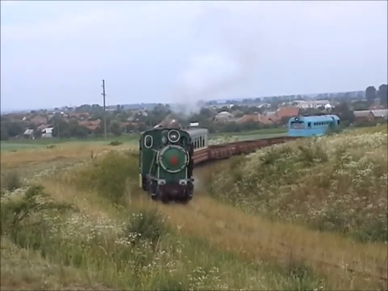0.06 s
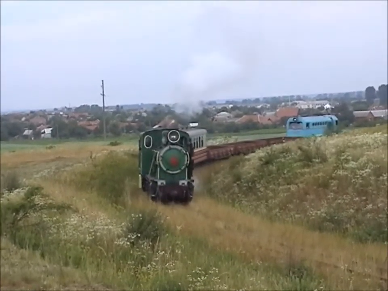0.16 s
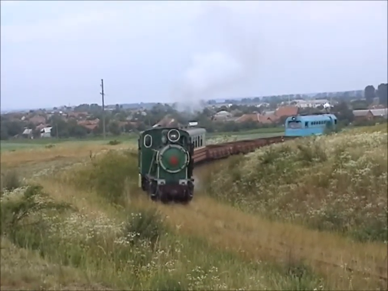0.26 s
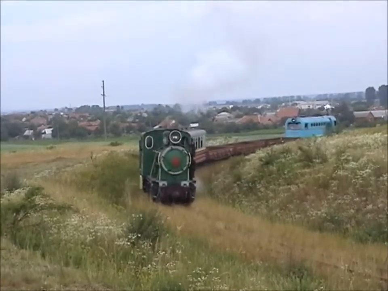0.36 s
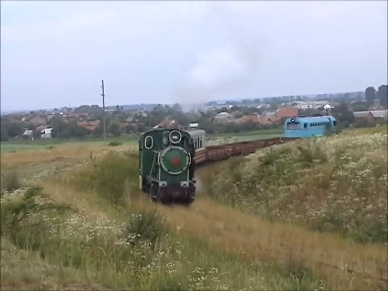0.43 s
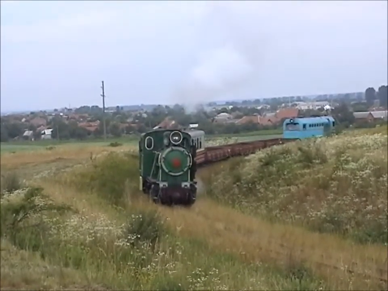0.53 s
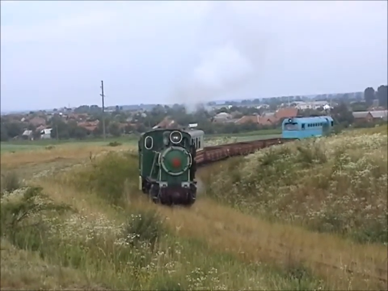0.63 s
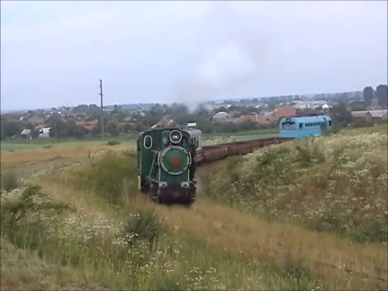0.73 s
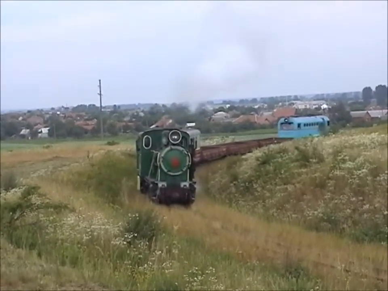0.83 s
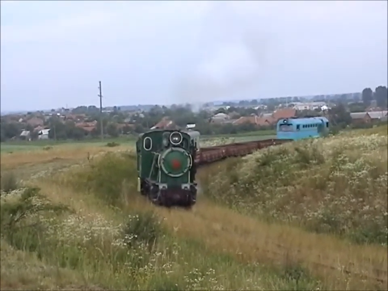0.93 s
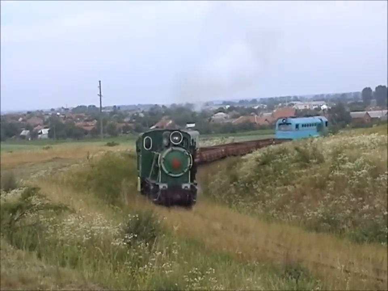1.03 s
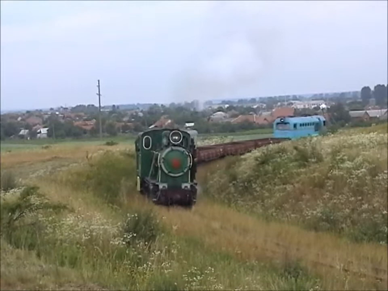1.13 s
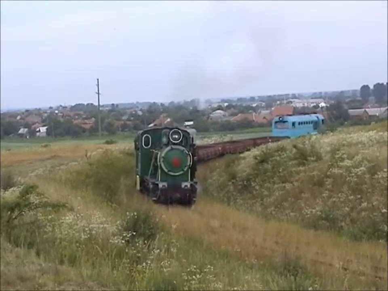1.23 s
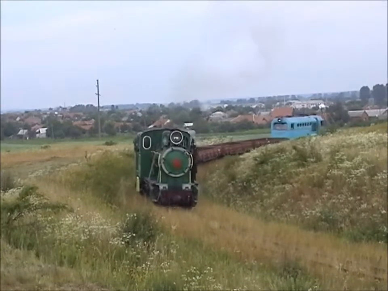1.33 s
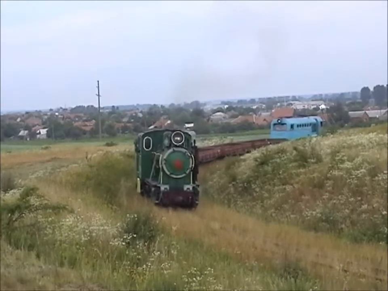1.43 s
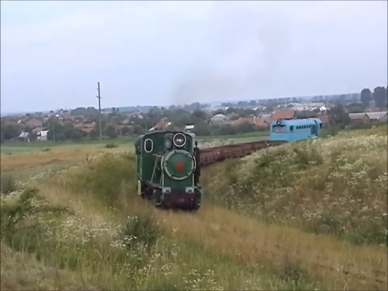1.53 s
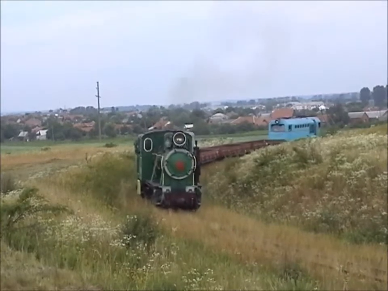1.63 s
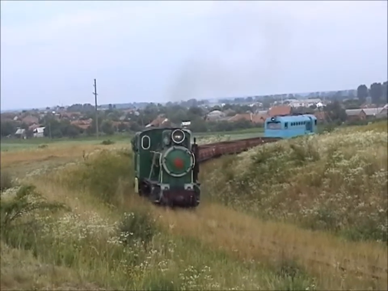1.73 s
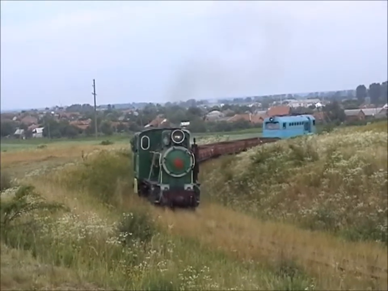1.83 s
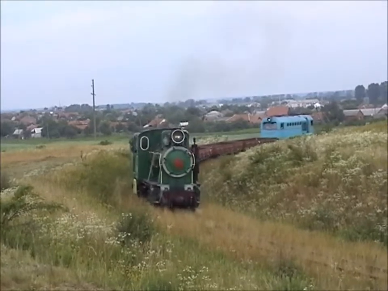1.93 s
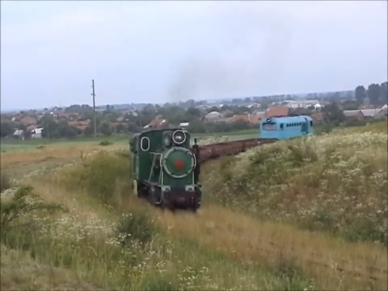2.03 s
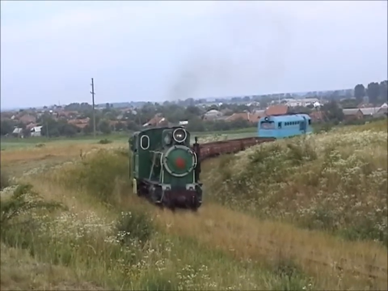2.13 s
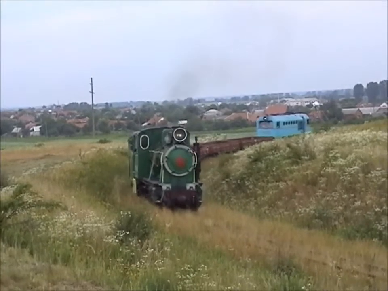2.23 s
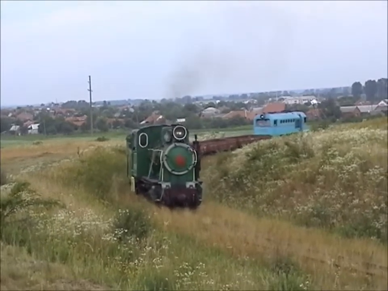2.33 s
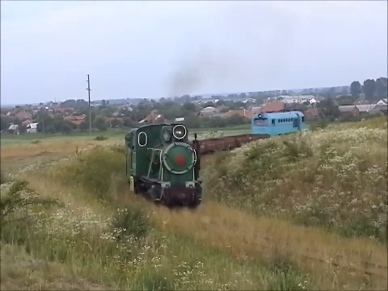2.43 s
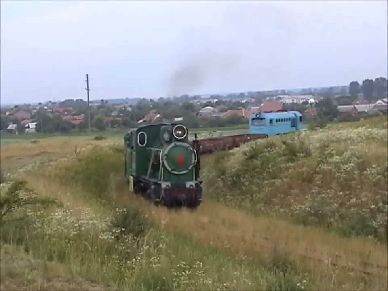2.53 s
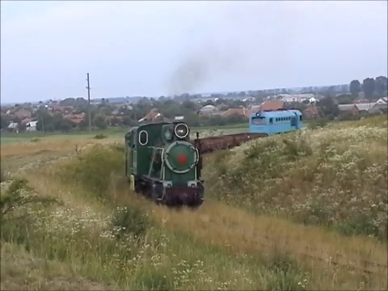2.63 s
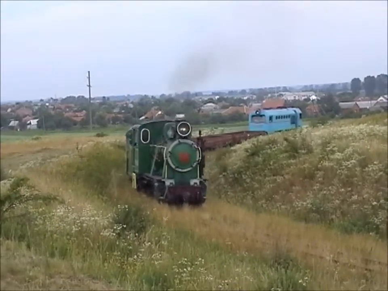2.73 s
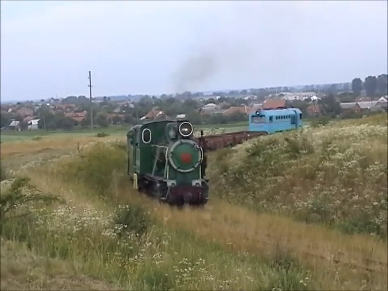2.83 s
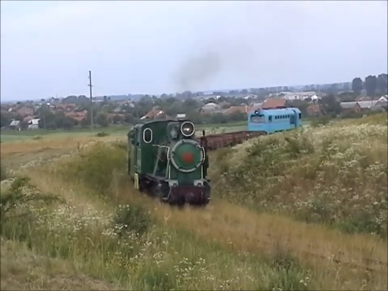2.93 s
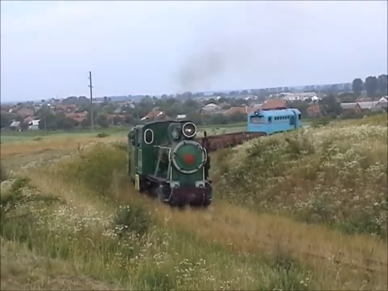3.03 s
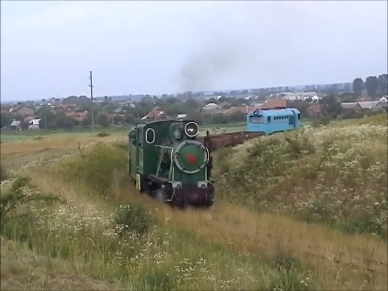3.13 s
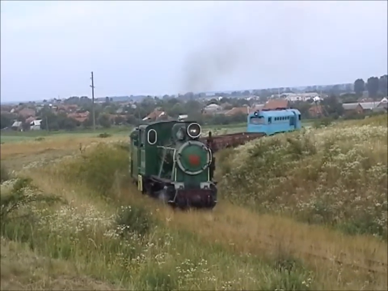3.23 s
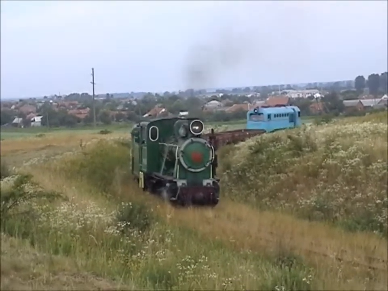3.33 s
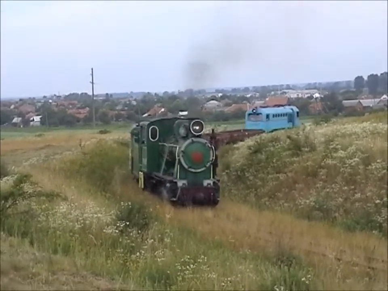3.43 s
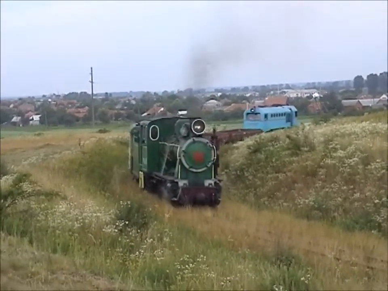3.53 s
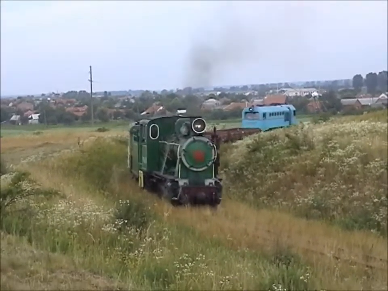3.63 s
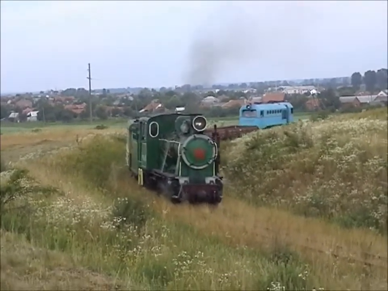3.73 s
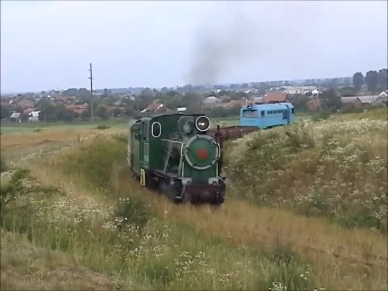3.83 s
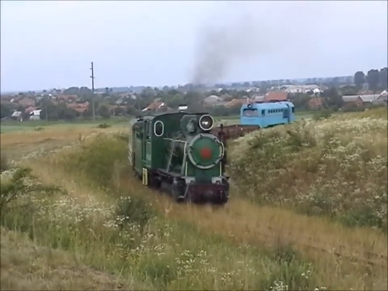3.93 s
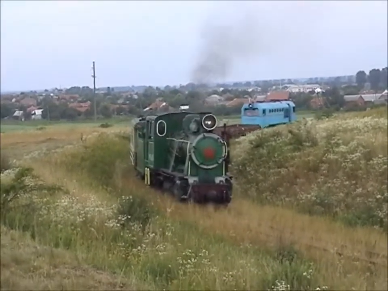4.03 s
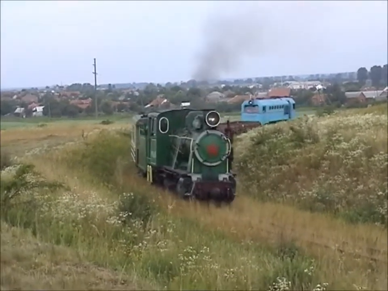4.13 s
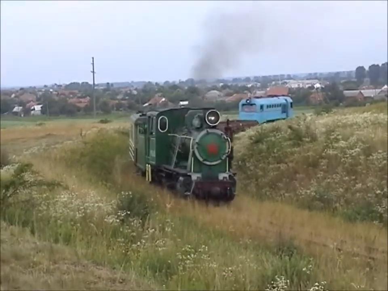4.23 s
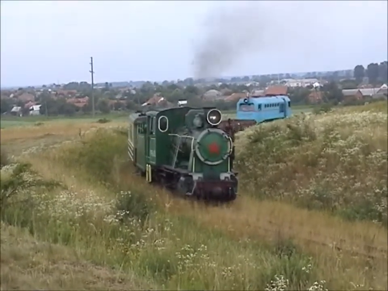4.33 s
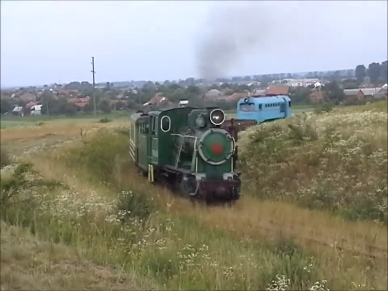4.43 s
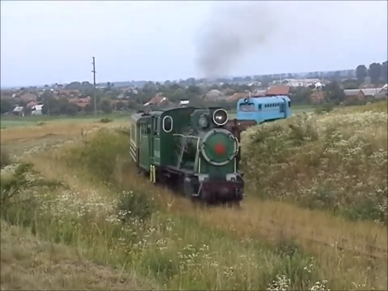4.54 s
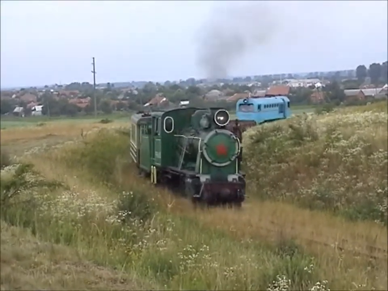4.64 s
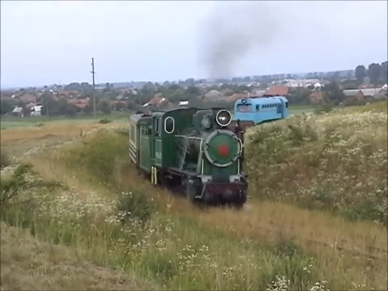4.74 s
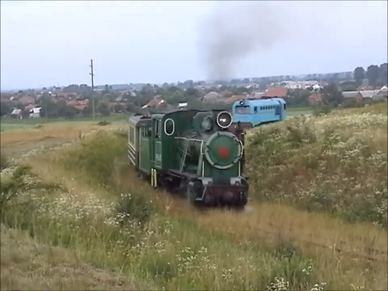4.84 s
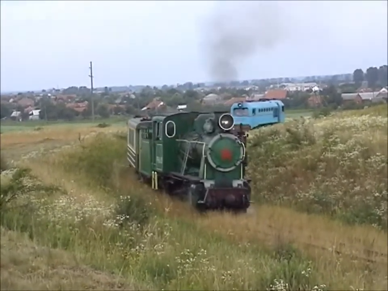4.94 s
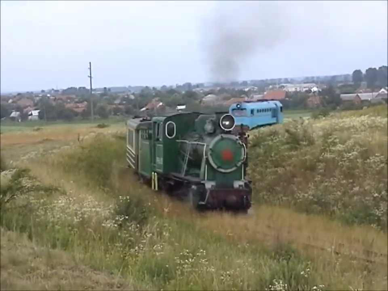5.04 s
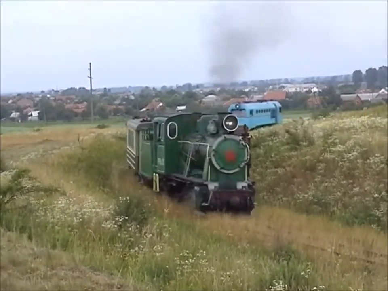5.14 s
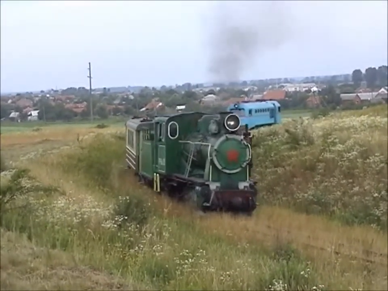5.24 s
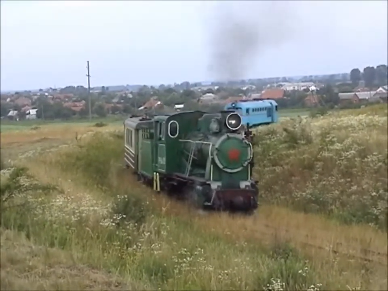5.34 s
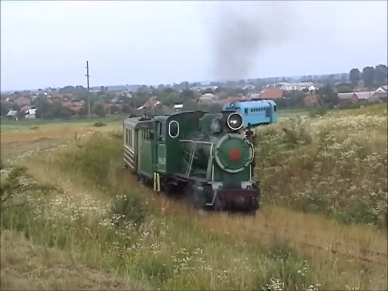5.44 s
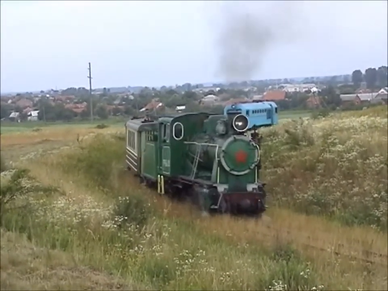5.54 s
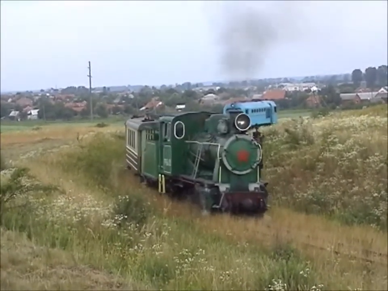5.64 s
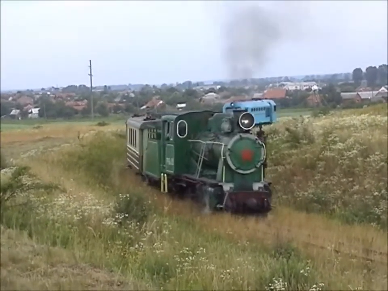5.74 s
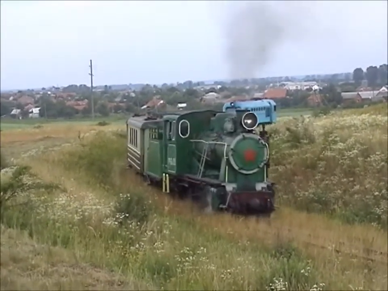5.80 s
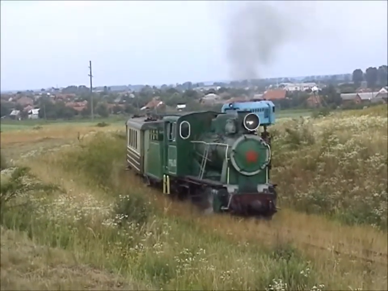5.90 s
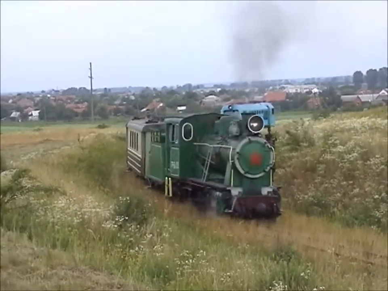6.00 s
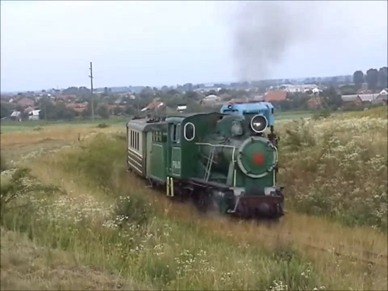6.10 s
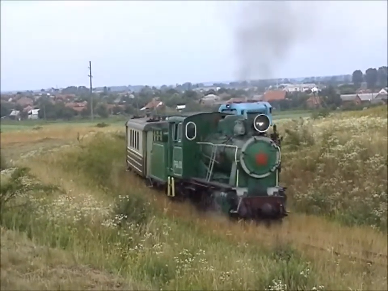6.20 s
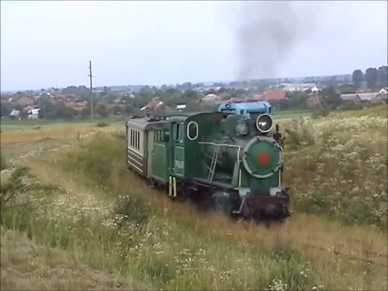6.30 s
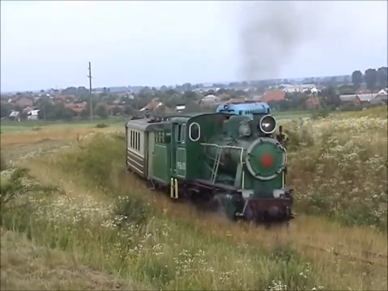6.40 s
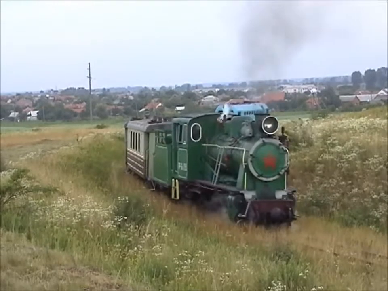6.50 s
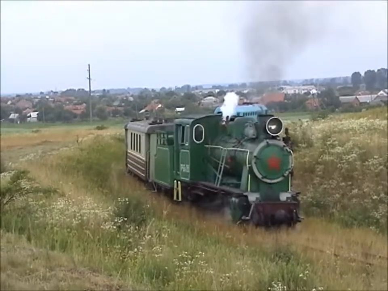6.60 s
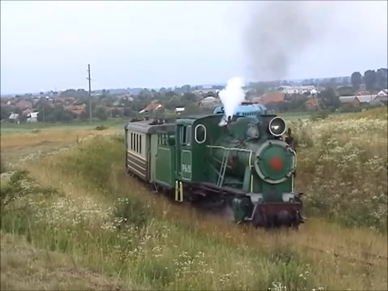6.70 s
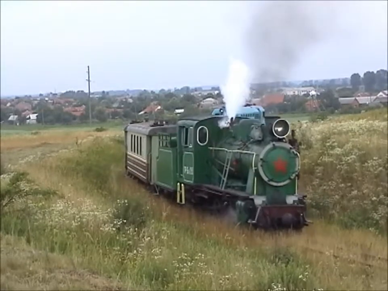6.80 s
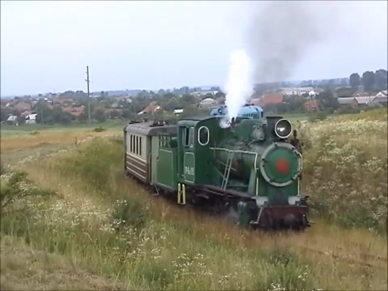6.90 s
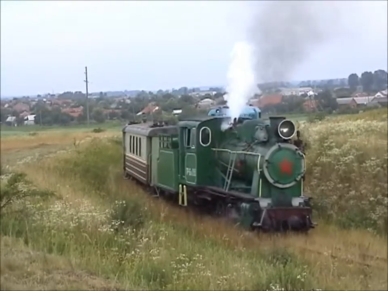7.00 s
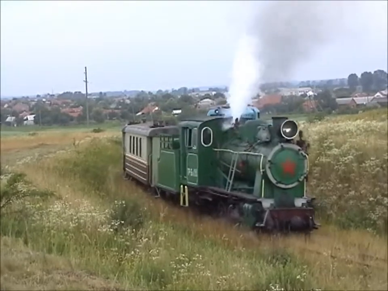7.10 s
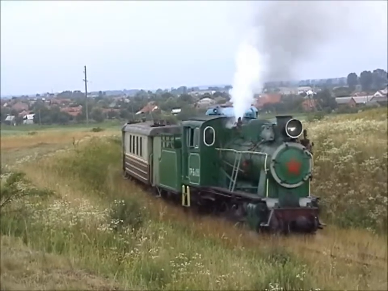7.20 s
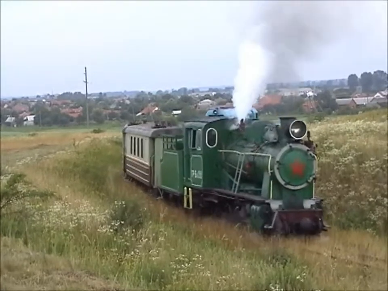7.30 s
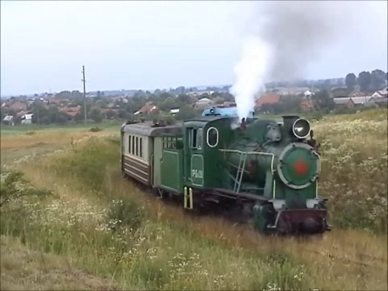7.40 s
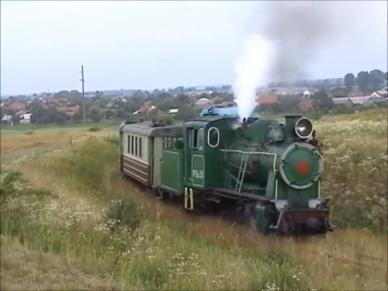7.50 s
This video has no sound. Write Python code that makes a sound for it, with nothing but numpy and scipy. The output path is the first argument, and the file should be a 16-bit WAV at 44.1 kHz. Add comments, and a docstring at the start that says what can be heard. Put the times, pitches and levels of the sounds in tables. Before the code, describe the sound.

From 0 s a slow steam locomotive is heard in the open, already mid-turn. New wheel turns begin near 0.5, 1.5, 2.4, 3.3, 4.1, 5.0 and 5.9 s. Each opens with a bright, sizzling jet of wet steam, torn by tiny crackling bursts, then overlaps into a lower, hollow rush. Four soft, wavering low chuffs per turn sit underneath, the first strongest, with a faint rumble of wheels and uneven clatter of rods and couplings. Opening gushes and chuffs grow fuller as the engine nears, strongest around 5.9 s. At about 6.5 s the whistle spits wet steam; from 6.56 s it speaks loudly, flat and rough, glides upward over a few tenths of a second and brightens. A higher chime joins around 6.7 s, with steady hiss. The train drops far beneath, a faint clank buried at 7 s, and the whistle holds to the end, about 7.5 s.

```python
"""A narrow-gauge steam locomotive rolls slowly closer across open grassland. Once a wheel turn its cylinders
blow shaped noise: a bright, sizzling jet, then a hollow rush, both torn by random bursts.
The chimney gives four soft beats a turn, wavering low sines and puffs of noise, over filtered-noise rumble and clatter.
At the end the whistle spits noise, then speaks in gliding sines with overtones, a second chime and a hiss;
the train sinks away beneath it."""
import sys
import numpy as np
from scipy import signal
from scipy.fft import rfft, irfft
from scipy.io import wavfile
from scipy.ndimage import map_coordinates

SR = 44100
rng = np.random.default_rng(int(sys.argv[2]) if len(sys.argv) > 2 else 0)


def master(y):
    """Save y as 16-bit WAV."""
    cut = np.clip(np.atleast_2d(y).T, -1, 1)
    pcm = np.round(cut * 32767)  # scale
    wavfile.write(sys.argv[1], SR, pcm.astype(np.int16))


N = 333396
T = np.arange(N) / SR
FROM_MIDDLE_S = T - T.mean()
HZ = np.maximum(np.arange(N // 2 + 1) * SR / N, 1)
SIDES = np.array([[1], [-1]])  # left, right
SPEAKS_S = 6.561  # the whistle's bell sounds
DRIES_S = 6.635  # the whistle's condensate clears


def undb(db):
    """Decibels to gain."""
    return 10 ** (np.asarray(db) / 20)


def ramp(start, length):
    """A straight rise from 0 to 1."""
    return np.clip((T - start) / length, 0, 1)


def swell(t, rise, fall):
    """A puff that builds up straight and dies away exponentially; peak 1."""
    return np.clip(t / rise, 0, 1) * np.exp(-np.maximum(t - rise, 0) / fall)


def stroke(t, rise, hold, fall, sag_db=0):
    """Flow through a valve: it opens, sags by sag_db a second for up to 1 s, and starts to close at the time hold."""
    opening = np.clip(t / rise, 0, 1)
    sag = undb(-sag_db * np.clip(t - rise, 0, 1))
    closing = np.clip(1 - (t - hold) / fall, 0, 1)
    return opening * sag * closing


def walk(rate):
    """Smooth chance with a spread near 1 that changes about rate times a second."""
    knots = rng.standard_normal(4000)
    fine = signal.resample_poly(knots, 8, 1)
    return np.interp(T * rate * 2, np.arange(len(fine)) / 8, fine)


def colour(points, peaks=()):
    """Gain at every frequency: a broad outline, straight over log frequency, with resonances on top."""
    hz, db = np.transpose(points)
    outline = np.interp(np.log(HZ), np.log(hz), db)
    resonances = sum(lift * np.exp(-2 * ((HZ - f) / width) ** 2) for f, width, lift in peaks)
    return undb(outline + resonances)


def noise(gain, band=(0, SR)):
    """Coloured stereo noise, nearly alike left and right; its mid has rms 1 inside the band (Hz)."""
    # stereo width: (frequency [Hz], side minus mid [dB])
    side_level = [(60, -19), (700, -17), (1300, -13), (2400, -19), (6000, -21.5), (9000, -8.5),
                  (12000, -35)]
    # stereo balance: (frequency [Hz], left minus right [dB])
    left_lean = [(60, -2), (200, -2.5), (700, -.5), (2400, 0.3), (7000, .6), (9000, 2), (12000, 0)]
    mid, side = rfft(rng.standard_normal((2, N))) * gain
    in_band = (HZ > band[0]) * (HZ < band[1])
    rms = irfft(mid * in_band, N).std()
    spread = mid + SIDES * side * colour(side_level)
    return irfft(spread * colour(left_lean) ** (SIDES / 2), N) / rms


def sputter(rate, size, length):
    """Gain of 1 plus short random bursts, as drops tear through a wet jet: rate a second, mean size, decay in s."""
    chance, sizes = rng.random(N), rng.exponential(size=N)
    hits = (chance < rate / SR) * sizes
    return 1 + size * signal.lfilter([1], [1, -np.exp(-1 / (length * SR))], hits)


def shifting(x, patchy_db, width_hz, hold_s):
    """Narrow bands of the hiss swell and fade, each by itself."""
    hz, s, cells = signal.stft(x, SR, nperseg=1024)
    places = np.meshgrid(hz / width_hz, s / hold_s, indexing="ij")
    patches = map_coordinates(rng.standard_normal((256, 128)), places, mode="mirror")
    return signal.istft(cells * undb(patchy_db * patches), SR)[1][:, :N]


def ground(x, lag_ms, share, drift):
    """A grazing bounce off the ground comes back inverted; its lag drifts as the engine moves."""
    lag_s = lag_ms * (1 + drift * walk(0.485)) / 1000
    at = np.arange(N) - SR * lag_s
    bounce = np.array([map_coordinates(channel, [at], order=3) for channel in x])
    return (x - share * bounce) / np.hypot(1, share)


def turns():
    """Each turn of the driving wheels with its length in s; the last one keeps the pace."""
    # wheel turns: (start [s], jet level [dB], jet rise [s], jet sag [dB/s], opening gush level [dB],
    # hollow rush level [dB], rush sag [dB/s], chimney thump level before accent and trim [dB])
    wheel_turns = [(-0.345, -15, 0.1, 31.5, -42, -19.5, 39, -33),
                   (0.542, -20, 0.15, 8, -33, -21.5, 14, -32.5),
                   (1.462, -19.5, 0.18, 18.5, -28, -21, 7, -29.5),
                   (2.353, -17.5, 0.17, 22, -28, -21, -2.5, -26.5),
                   (3.262, -19, 0.15, 12, -27.5, -19.5, 14, -29.5),
                   (4.141, -18, 0.14, 9, -24.5, -22, 4, -28), (5.018, -17.5, 0.11, 12.5, -22, -21, 2, -27),
                   (5.894, -18.5, 0.09, 11.5, -20.5, -21, 5, -21)]
    lengths = np.diff([turn[0] for turn in wheel_turns])
    return zip(wheel_turns, np.append(lengths, lengths[-1]))


def flows():
    """Steam flow in each turn: a gush opens the jet, it sizzles at full pressure, the return stroke rushes; a leak builds."""
    lead_s = 0.041  # the jet opens just before the first beat
    jet, gush, sizzle, rush, leak = np.zeros((5, N))
    for (s, jet_db, rise_s, sag_db, gush_db, rush_db, rush_sag_db, _), length in turns():
        t = T - s + lead_s
        # the jet starts to close after two thirds of the turn
        jet += undb(jet_db) * stroke(t, rise_s, hold=0.66 * length, fall=0.18, sag_db=sag_db)
        gush += undb(gush_db) * swell(t, rise=0.063, fall=0.06)
        # full pressure comes early in the jet
        sizzle += undb(-26.5) * stroke(t - 0.077, rise=0.066, hold=0.24, fall=0.11, sag_db=10)
        rush += undb(rush_db) * stroke(t - 0.27, rise=0.11, hold=0.28, fall=0.22, sag_db=rush_sag_db)
        leak += stroke(t + 0.15, rise=0.083, hold=0.2, fall=0.12)
    # the leak swells by 6.5 dB around the start of each turn, as pressure builds
    return jet, gush, sizzle, rush, undb(-34 + 6.5 * (leak - 1))


def cylinders():
    """The two ends of the piston's stroke blow wet steam in turn; the jet sizzles while its pressure is high."""
    # outlines of jet, its low body, sizzle and rush: (frequency [Hz], level [dB])
    jet_colour = [(700, -29), (1500, -15.5), (2300, -8.5), (3150, -7.5), (3600, -3), (4700, -4), (5300, -2),
                  (7100, -1), (7900, -10.5), (9000, -38), (12000, -41)]
    body_colour = [(1400, -28), (2000, -8.5), (2350, 0.5), (2800, 9.5), (3150, -6), (3600, 3), (4500, -6),
                   (6000, -48)]
    sizzle_colour = [(4000, -26.5), (6500, -25), (7500, 0), (8200, -1.5), (9500, -4), (11200, -11),
                     (12200, -16), (15500, -20)]
    rush_colour = [(600, -46), (1400, -15.5), (1680, -2.5), (2300, -6), (2550, -13.5), (3200, -6),
                   (3600, -8), (4400, -8.5), (4850, -31), (6900, -16), (9000, -41)]
    # their resonances: (frequency [Hz], width [Hz], lift [dB])
    jet_peaks = [(3440, 270, 4.8), (5000, 520, 4.1), (6140, 260, 2.7), (6840, 290, 4.4)]
    sizzle_peaks = [(7570, 270, 4.7), (8850, 490, 4.6), (10100, 590, 4.6), (11380, 270, 4.6)]
    rush_peaks = [(1759, 180, 7.3), (1946, 114, 6.9), (2219, 97, 9.6), (3570, 250, 5.4), (4230, 920, 3.8)]

    jet_flow, gush_flow, sizzle_flow, rush_flow, leak_flow = flows()
    # steam that escapes between strokes gets louder as the engine nears
    nearing_db_per_s = 1.3
    near = undb(nearing_db_per_s * FROM_MIDDLE_S)
    flow = np.hypot(jet_flow, leak_flow * near) * undb(0.62 * walk(14))

    # the gush reaches the bright jet a moment later
    surge = undb(-3) * np.interp(T - 0.043, T, gush_flow)
    jet = noise(colour(jet_colour, jet_peaks), band=(4800, 7300)) * (flow + surge)
    fizz = undb(-11) * flow
    sizzle = noise(colour(sizzle_colour, sizzle_peaks), band=(8500, 12000)) * np.hypot(sizzle_flow, fizz)

    # the jet sounds lower as it opens, and its body fills out as the engine comes closer
    body_flow = flow * undb(-13 + nearing_db_per_s * FROM_MIDDLE_S)
    body = noise(colour(body_colour)) * np.hypot(gush_flow, body_flow)

    jet_share, leak_share = undb(-17) * flow, undb(-39.5) * near
    hollow = np.sqrt(rush_flow ** 2 + jet_share ** 2 + leak_share ** 2)
    unsteady = undb(0.86 * walk(14) + 0.5 * walk(65))
    rush = noise(colour(rush_colour, rush_peaks), band=(1650, 2350)) * hollow * unsteady

    wet = (jet + sizzle + body) * sputter(rate=36, size=0.25, length=0.00074)
    wet = wet + rush * sputter(rate=50, size=0.35, length=0.00026)
    wet = shifting(wet, patchy_db=1.9, width_hz=150, hold_s=0.16)
    return ground(wet, lag_ms=0.6015, share=0.21, drift=0.02)


def chimney():
    """Every exhaust beat rings the chimney's air column and lets out a soft puff."""
    # four beats of a turn: (share of the turn, thump accent [dB], puff level before trim [dB])
    quarters = [(0, 2, -25), (0.252, -4, -35), (0.499, -3, -30.5), (0.761, -0.5, -29)]
    # resonances of the air column: (frequency [Hz], level [dB])
    air_column = [(168, -9), (203, 3), (248, -8.5)]
    # outline of the puff: (frequency [Hz], level [dB])
    puff_colour = [(90, -36), (220, 8), (300, -2), (450, 1), (580, -9), (720, 2), (1100, 4.5),
                   (1400, -12.5), (2000, -25), (5000, -54)]
    thump_trim_db, puff_trim_db = -5, -3
    thumps, puffs = np.zeros(N), np.zeros(N)
    for (s, *_, turn_db), length in turns():
        for share, accent_db, level_db in quarters:
            t = T - s - share * length
            thumps += undb(turn_db + accent_db + thump_trim_db) * swell(t, rise=0.013, fall=0.036)
            puffs += undb(level_db + puff_trim_db) * swell(t, rise=0.0095, fall=0.04)
    # the churning gas unsettles the pitch and strength of each resonance
    column = 0
    for hz, db in air_column:
        phase = 2 * np.pi * np.cumsum(hz * (1 + 0.0377 * walk(30))) / SR
        column = column + undb(db) * (1 + 0.48 * walk(40)) * np.sin(phase)
    ringing = thumps * column * undb(-1.3 * SIDES)  # leans right
    return ringing + puffs * noise(colour(puff_colour))


def rolling():
    """Wheels and wagons rumble; rods and couplings chatter unevenly and clank once."""
    # outlines of rumble and clatter: (frequency [Hz], level [dB])
    rumble_colour = [(20, -46), (40, -33), (62, -2.5), (110, 0), (160, -4.5), (220, 0.5), (300, -6),
                     (420, -1.5), (520, -6), (600, -29), (900, -29.5)]
    clatter_colour = [(480, -56), (600, -11), (720, 0.5), (900, -1.5), (1150, 1), (1400, -9), (1650, -0.5),
                      (3000, -7.5), (8000, -74)]
    rumble = noise(colour(rumble_colour)) * undb(-42.5 + 1.3 * walk(12))
    uneven = undb(1.3 * walk(14)) * sputter(rate=16, size=0.25, length=0.006)
    chatter = undb(-35 + 0.03 * FROM_MIDDLE_S) * uneven
    clank = undb(-25) * swell(T - 7, rise=0.011, fall=0.016)
    return rumble + noise(colour(clatter_colour)) * (chatter + clank)


def whistle_steam():
    """The valve first spits condensate, then dry steam hisses over the lip."""
    # slugs of condensate thrown out: (time [s], level [dB])
    slug_times = [(6.524, -16), (6.605, -25)]
    # outlines of spit and lip hiss: (frequency [Hz], level [dB])
    spit_colour = [(500, -21), (900, 11), (1200, -1.5), (1420, -15), (1800, -2), (2400, -3.5), (5500, -1),
                   (7500, -5), (11000, -16.5), (15500, -32)]
    lip_colour = [(60, -29), (200, -10), (560, -14.5), (720, 0), (1000, 6), (1280, 7.5), (1420, -37),
                  (1600, -2), (2000, 1.5), (6800, 1.5), (8200, -4), (10500, -7.5), (12000, -17),
                  (15500, -21)]
    # resonances of the spit and of the bell: (frequency [Hz], width [Hz], lift [dB])
    spit_peaks = [(1010, 47, 4.5), (2720, 330, 8.6), (3330, 280, 7.4), (5160, 170, 10)]
    bell_peaks = [(679, 48, 12.5), (940, 92, 9.6)]
    dry_share = ramp(DRIES_S, 0.085)
    slugs = sum(undb(db) * swell(T - s, rise=0.037, fall=0.068) for s, db in slug_times)
    spit = noise(colour(spit_colour, spit_peaks)) * sputter(rate=100, size=0.5, length=0.0016) * slugs
    hiss = noise(colour(lip_colour, bell_peaks)) * undb(-28.5 + 0.5 * walk(50))
    steam = np.sqrt(1 - dry_share) * spit + np.sqrt(dry_share) * hiss
    return shifting(steam, patchy_db=1.3, width_hz=150, hold_s=0.12)


def whistle():
    """Wet steam makes the bell speak flat and rough; as it dries the note rises, brightens and a second chime joins."""
    # loudness of the note: (time [s], level [dB])
    note_level = [(6.58, -13), (6.596, -9), (6.63, -14), (6.664, -9), (6.732, -14.5), (6.876, -17),
                  (6.926, -13.5), (7.058, -13), (7.108, -11), (7.54, -11)]
    # even and odd overtones: (multiple of the note, level within its series [dB])
    even_overtones = [(2, 0), (4, -15), (6, -23), (8, -26)]
    odd_overtones = [(3, 0), (5, -9), (7, -10), (9, -25), (11, -24)]
    wet_hz, dry_hz, warming_s = 827, 918.5, 0.155  # warming_s: time constant of the rise in pitch
    even_db, odd_db, chime_db = -26.5, -30, -27.5  # at full pressure
    chime_hz = 1201

    hz = dry_hz + (wet_hz - dry_hz) * np.exp(-np.maximum(T - DRIES_S, 0) / warming_s)
    hz = hz * (1 + 0.0022 * walk(9))
    wet = 1 - ramp(SPEAKS_S, 0.24)
    weak = 1 - ramp(SPEAKS_S, 0.42)  # until full pressure
    rough = (0.0012 + 0.004 * wet) * walk(70)
    phase = 2 * np.pi * np.cumsum(hz * (1 + rough)) / SR
    note_s, note_db = np.transpose(note_level)
    tone_db = np.interp(T, note_s, note_db)
    tone = undb(tone_db + (0.5 + 0.88 * wet) * walk(60)) * np.sin(phase + 0.14 * SIDES)

    # the even overtones grow faster than the note itself
    even_now_db = even_db + 1.74 * (tone_db - tone_db[-1]) - 8 * wet
    for series, series_db in ((even_overtones, even_now_db), (odd_overtones, odd_db)):
        for k, own_db in series:
            # the high overtones only come in with full pressure
            lack_db = 7 * wet + 4 * weak * max(k - 4, 0)
            flutter_db = (1.6 + 1.5 * weak) * walk(25)
            tone = tone + undb(series_db + own_db - lack_db + flutter_db) * np.sin(round(k) * phase)

    chime_phase = 2 * np.pi * np.cumsum(chime_hz * (1 + 0.004 * walk(45))) / SR
    # the two notes share one jet, which adds a faint difference tone
    chime = np.sin(chime_phase) + undb(-31.5) * np.sin(chime_phase - phase)
    chime = chime * undb(chime_db - 7 * weak + 1.6 * walk(30)) * ramp(6.68, 0.05)
    # root 2 turns the levels into rms; the sound leans slightly right
    return np.sqrt(2) * (tone + chime) * ramp(SPEAKS_S, 0.0044) * undb(-0.4 * SIDES)


def scene():
    """The train, sinking away once the whistle speaks."""
    train = cylinders() + chimney() + rolling()
    sinking = undb(-25 * ramp(SPEAKS_S, 0.24))
    return train * sinking + whistle_steam() + whistle()


def record(dry):
    """A steep low-pass cuts the top above 15.6 kHz."""
    low_pass = signal.ellip(10, 0.1, 80, 15600, fs=SR, output="sos")
    return signal.sosfilt(low_pass, dry)


dry = scene()
out = record(dry)
master(out)
```